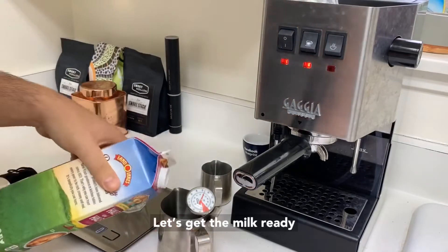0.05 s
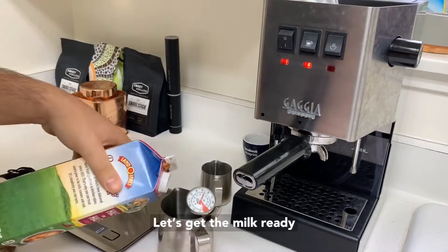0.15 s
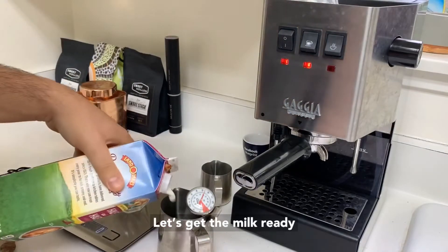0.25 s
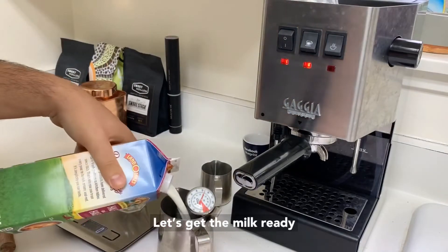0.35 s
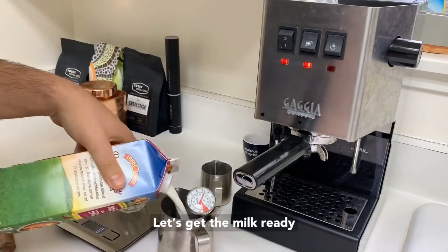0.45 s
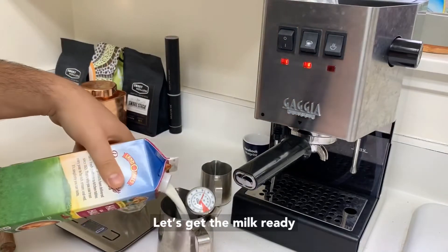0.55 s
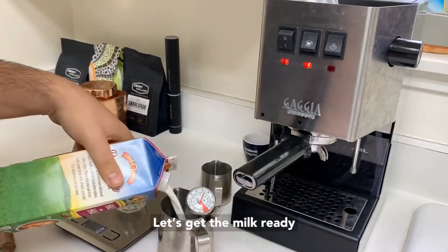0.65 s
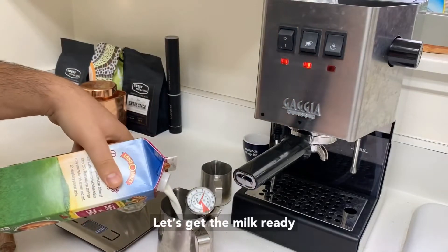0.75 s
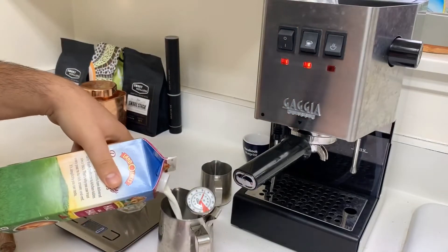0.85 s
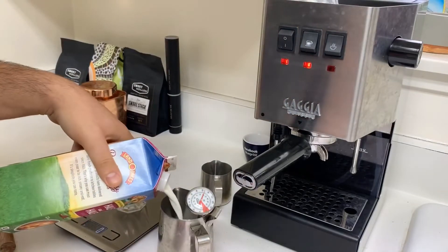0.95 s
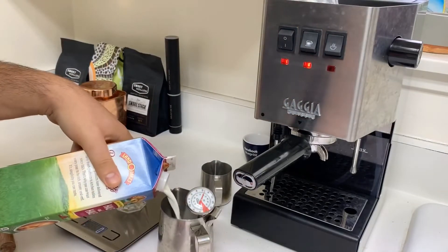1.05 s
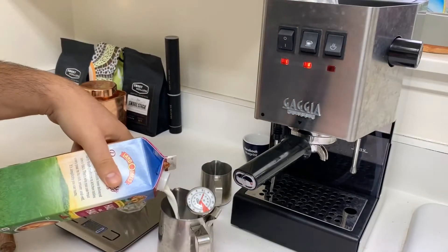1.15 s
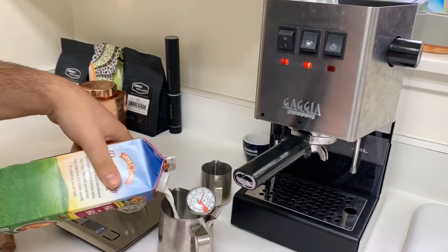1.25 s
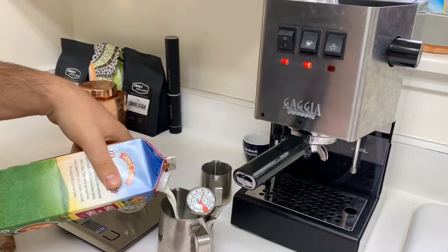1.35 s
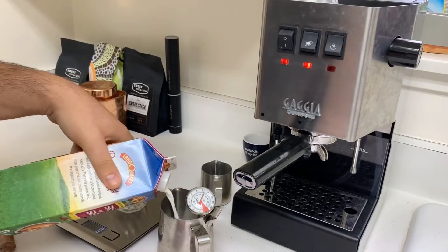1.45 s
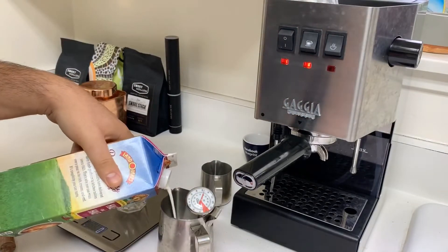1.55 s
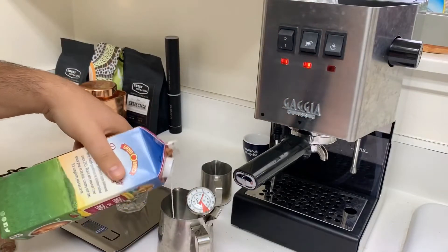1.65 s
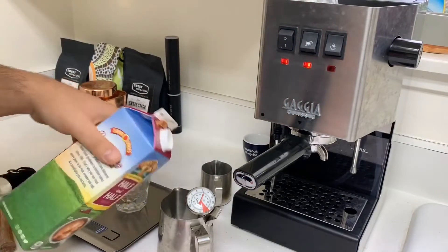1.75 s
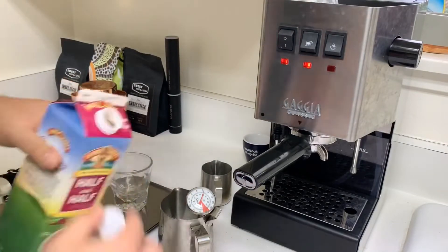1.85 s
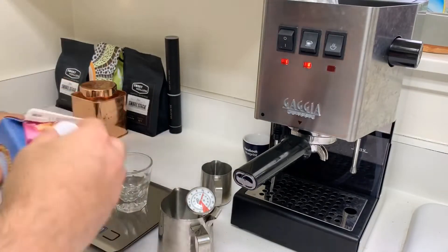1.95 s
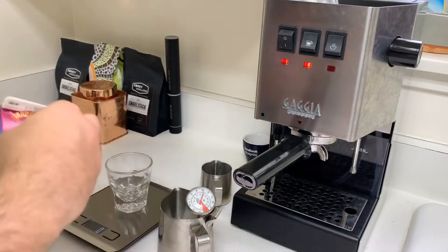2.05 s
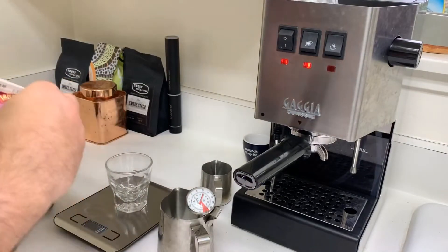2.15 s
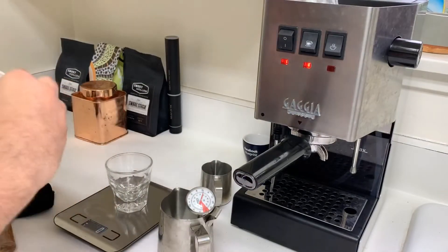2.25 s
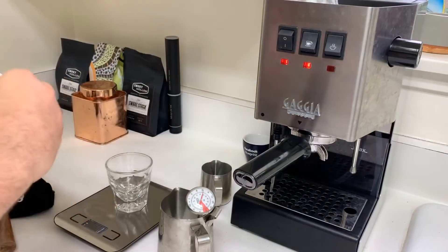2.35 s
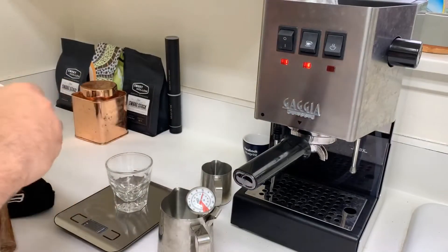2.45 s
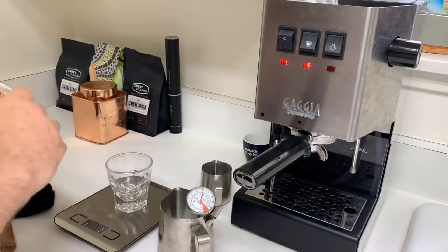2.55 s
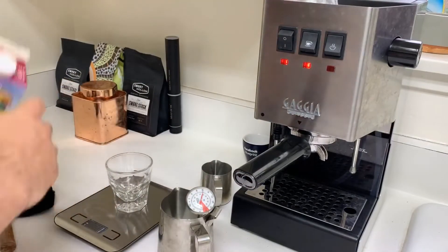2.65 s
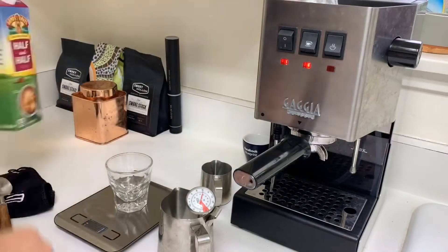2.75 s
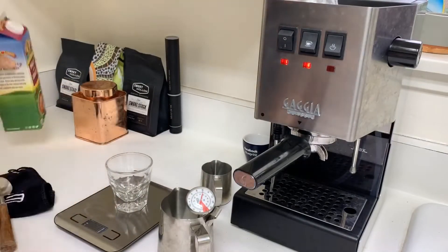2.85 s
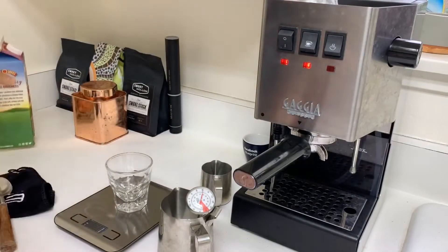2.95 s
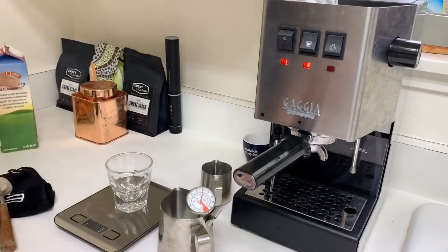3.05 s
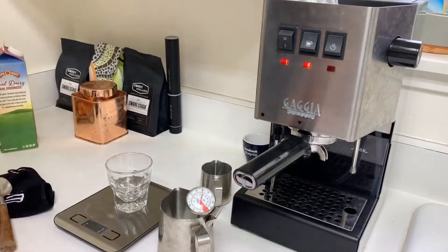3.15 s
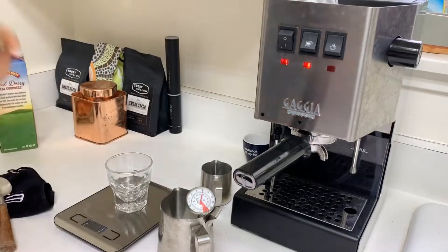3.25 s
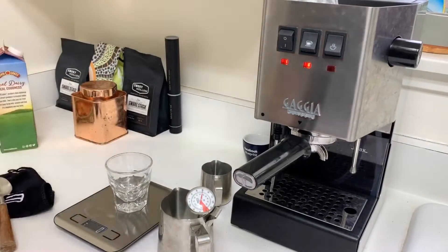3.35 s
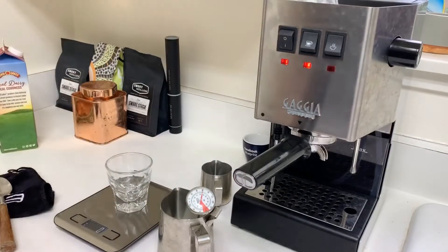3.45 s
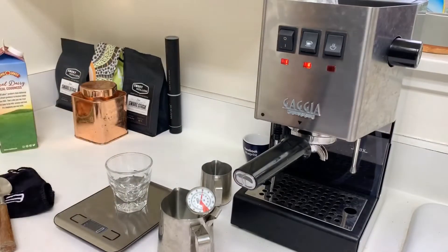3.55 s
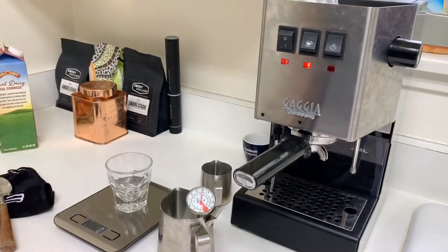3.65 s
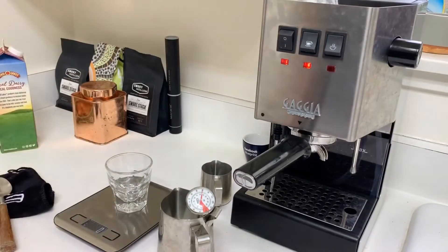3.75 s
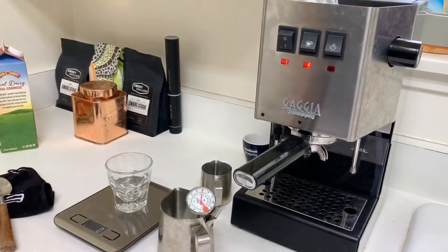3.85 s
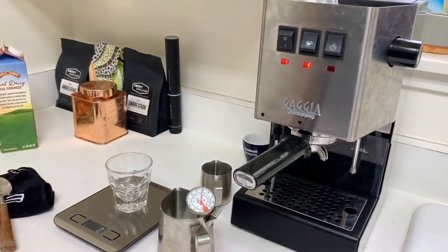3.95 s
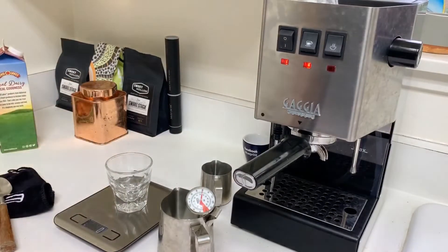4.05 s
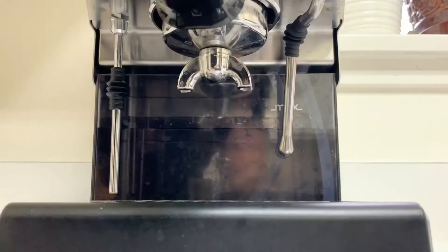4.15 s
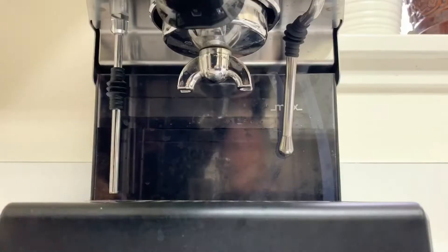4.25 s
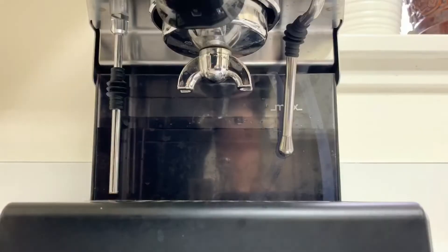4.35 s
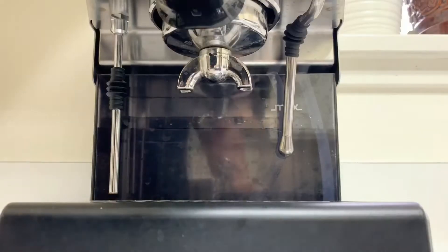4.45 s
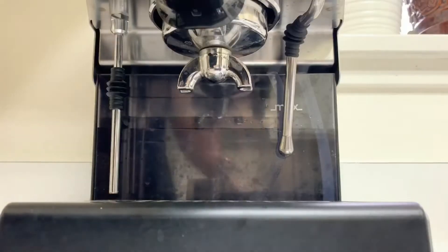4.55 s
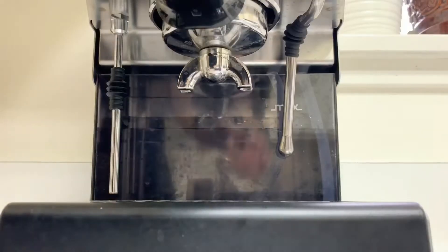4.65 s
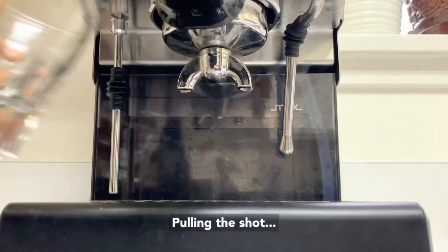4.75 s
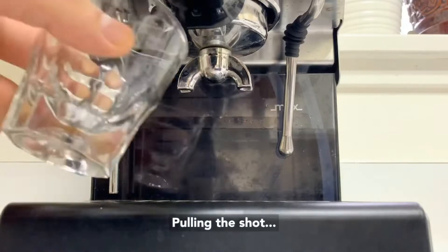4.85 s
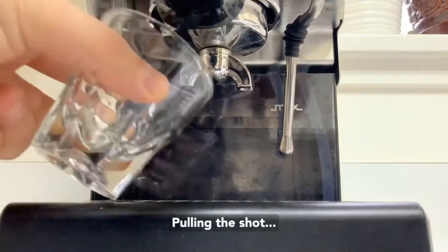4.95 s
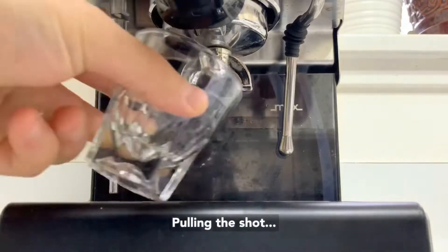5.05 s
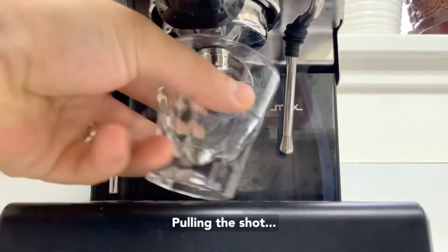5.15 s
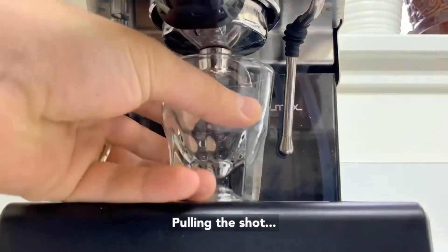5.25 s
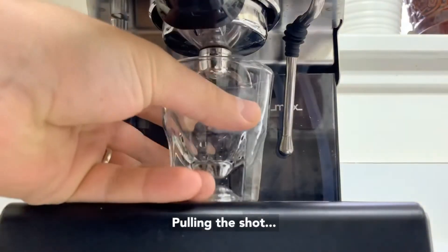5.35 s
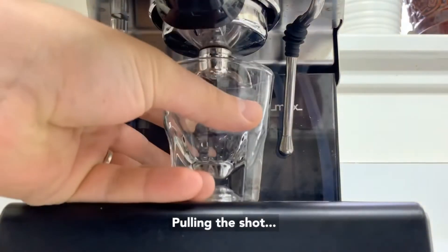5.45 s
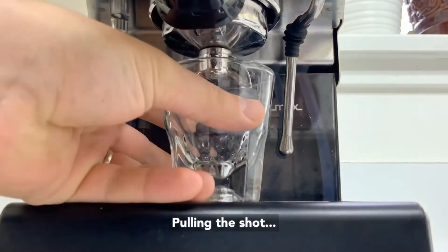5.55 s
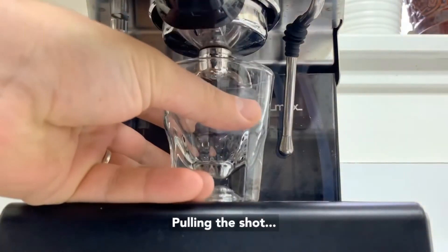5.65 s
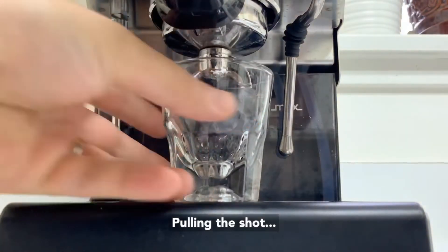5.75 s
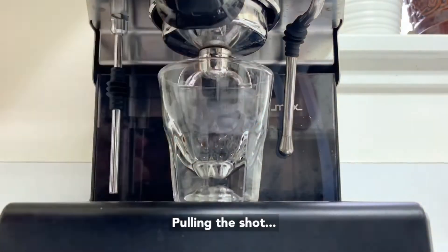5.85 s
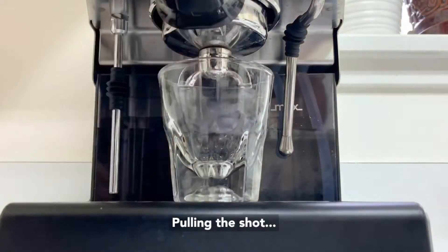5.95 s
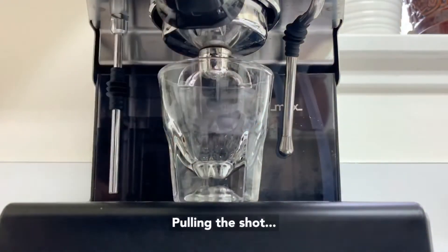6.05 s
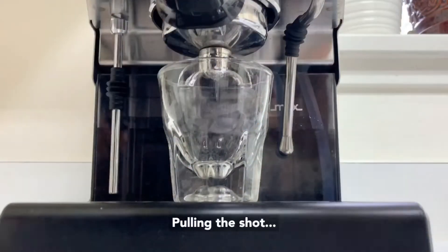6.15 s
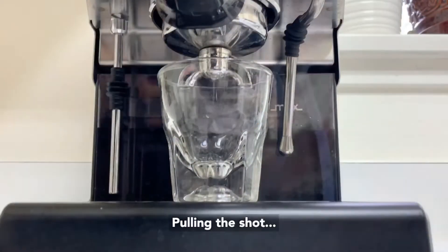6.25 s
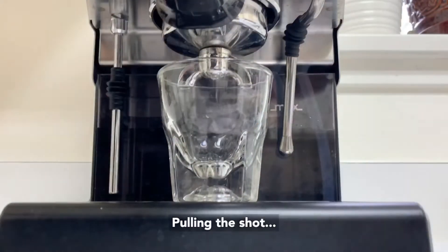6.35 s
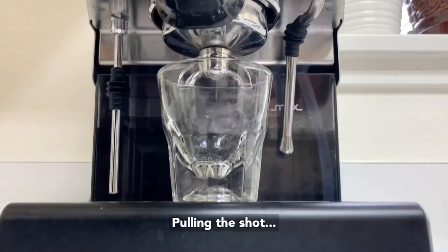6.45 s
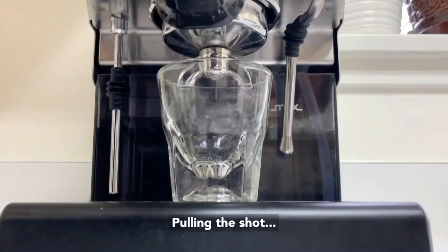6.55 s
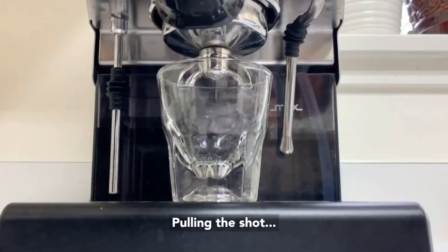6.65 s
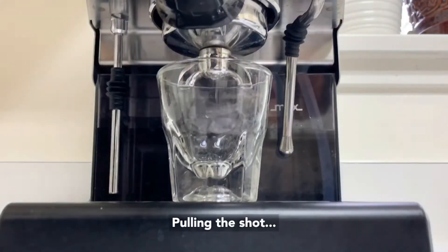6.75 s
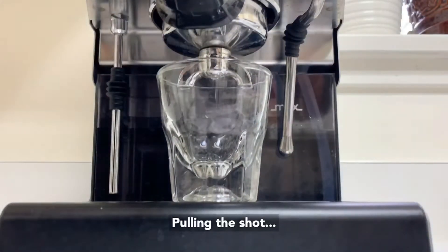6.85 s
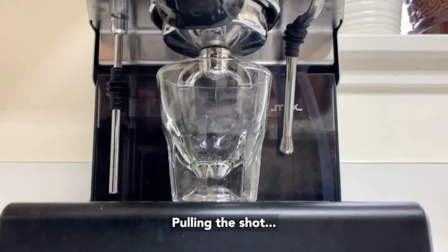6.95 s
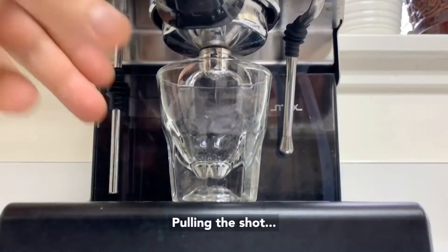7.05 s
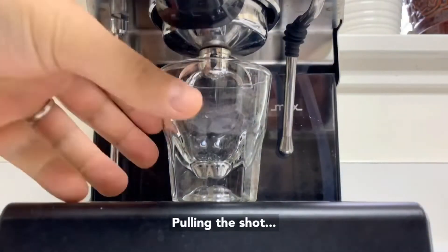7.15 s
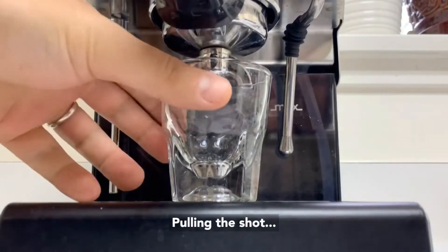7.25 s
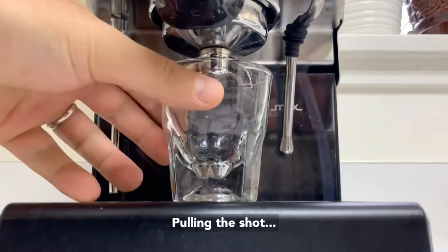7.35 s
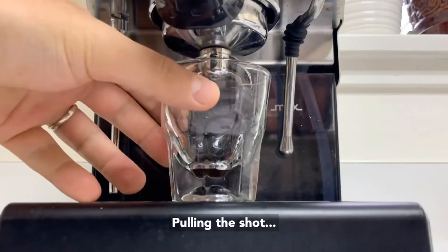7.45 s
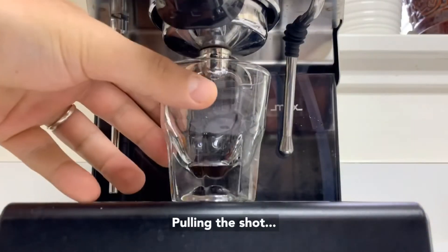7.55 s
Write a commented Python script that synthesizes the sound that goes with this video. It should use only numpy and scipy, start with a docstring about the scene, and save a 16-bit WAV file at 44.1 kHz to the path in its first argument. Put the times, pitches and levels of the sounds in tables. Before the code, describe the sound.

Close, dry domestic kitchen recording with faint room tone and hiss. First come quiet milk glugs, tiny ticks and drips, then papery carton knocks and cap snaps, and dull thumps on the counter. A lull follows. A thick glass knocks rapidly and brightly against the espresso machine's tray, sliding in short scrapes. One loud switch click starts a coarse electric pump buzz that changes colour as pressure builds, then weakens with rougher rattle and brief glass scraping.

```python
"""The vibration pump of an espresso machine, close to the microphone in a quiet home kitchen: it buzzes
first free, then against rising pressure, as overtones of its stroke rate coloured by the case, plus rattle.
Before it, at the counter, milk is poured from a carton, its cap is snapped on and it is set down; then, at
the machine, a glass is slid over the drip tray and a rocker switch snaps. Noisy contacts ring their modes.
Under it all lie room tone, rumble, slow pressure sway, faint appliance tones and microphone hiss."""
import sys
import numpy as np
from scipy import signal
from scipy.fft import rfft, irfft
from scipy.io import wavfile

SR = 44100
rng = np.random.default_rng(int(sys.argv[2]) if len(sys.argv) > 2 else 0)


def wrap_up_sound(samples):
    """Save the sound to the file named by the first command line argument, as 16-bit audio."""
    columns = np.atleast_2d(samples).T
    # keep every value between -1 and 1, then stretch to whole-number steps
    tamed = np.clip(columns, -1, 1)
    steps = np.round(tamed * 32767).astype(np.int16)
    wavfile.write(sys.argv[1], SR, steps)


N = 334719
TIME = np.arange(N) / SR

# Air of the kitchen. Each row: time in seconds, rms of slow pressure sway, of rumble and of room tone in dB.
AIR = [(0, -64.5, -69.5, -72.5), (1.1, -82, -68, -72.5), (2.6, -70.5, -65, -67.5),
       (3.18, -58.5, -60.5, -67.5), (3.32, -45, -60, -64.5), (3.92, -51, -65.5, -70.5),
       (4.1, -59.5, -67.5, -70), (5.95, -65.5, -73.5, -70)]
# Spectra of the room tone and of the microphone hiss. Each row: frequency in Hz, density in dB per Hz.
ROOM_TONE = [(82, -21), (140, -7), (451, -11), (770, -8.5), (903, -14.5), (2080, -18.5), (13400, -49.5),
             (16000, -62)]
HISS = [(1000, -17), (4000, -5), (11000, 3), (16000, -4.5)]
# Faint appliance tones at the counter and near the machine. Each row: frequency in Hz, mean rms level in dB.
COUNTER_TONES = [(969.0, -80.5), (1093, -83), (1577, -86.5), (6923, -100)]
MACHINE_TONES = [(155.6, -74.5), (769.8, -78.5), (1017, -82.5), (1384, -84), (1846, -85.5), (2003, -85),
                 (8769, -99)]
# Drips and small ticks. Each row: start in seconds, peak in dB, pitch in Hz, second pitch in Hz,
# t60 of the first pitch in seconds.
DRIPS = [(.38, -68, 4500, 7200, .02), (.418, -57, 5900, 10500, .02), (.44, -63, 3500, 5400, .025),
         (.467, -59, 10700, 7800, .03), (.659, -60, 5350, 1750, .1), (.712, -62, 6500, 4300, .07),
         (1.662, -50, 3413, 5943, .07), (4.515, -62, 4300, 6500, .015)]
# Brushing hands. Each row: moment of the swell's top in seconds, level in dB, decay constant in seconds.
SWISHES = [(.45, -75.5, 0.1), (.72, -75, 0.014), (2.33, -67.5, 0.12), (2.949, -63, 0.055),
           (3.364, -53.5, 0.033), (4.5, -70, 0.039), (4.72, -73, 0.14), (5.33, -74.5, 0.037)]
# Spectrum of the brushing. Each row: frequency in Hz, density in dB per Hz.
RUSTLE = [(1470, -22), (2500, -11), (5870, -16.5), (12200, -15.5), (16000, -17.5)]
# Blows on each object. Each row: start in seconds, nominal peak in dB, treble share in dB (held below -0.5).
MILK_GLUGS = [(0.532, -53.5, -23), (0.585, -51, -50), (0.834, -43, -53), (1.299, -56.5, -29),
              (1.53, -54, -37), (1.776, -49.5, -39)]
CARTON_KNOCKS = [(1.93, -48.5, -31), (1.945, -52.5, -3), (2.003, -44, -5.5), (2.011, -48, 1.5),
                 (2.058, -29, -6), (2.178, -39, -44), (2.252, -44, -5.5), (2.307, -36, -2.5),
                 (2.417, -53.5, -7), (2.503, -31.5, -7), (2.593, -49, -33), (3.014, -46, -11),
                 (3.031, -63, -25)]
COUNTER_THUMPS = [(2.744, -43, -22), (2.948, -34.5, -17), (3.339, -47.5, -1), (3.361, -38, -2.5),
                  (4.131, -54, -32)]
EDGE_TAPS = [(4.7848, -27, -2.8)]   # the glass first touches the edge of the tray
GLASS_KNOCKS = [(4.9364, -18, -1.5), (4.9515, -27, -4.5), (4.962, -28.5, -19.5), (4.9676, -23.5, 0.5),
                (4.9838, -22.5, -8), (5.009, -25.5, -13.5), (5.023, -28.5, -2.5), (5.0275, -27.5, -17.5),
                (5.0557, -31, -3.5), (5.0651, -14, -3), (5.0862, -21.5, -2), (5.097, -27.5, -3),
                (5.1063, -28, -7), (5.1178, -20, -3.5), (5.1634, -27.5, -6.5), (5.1735, -27.5, -7.5),
                (5.212, -21.5, -2), (5.3173, -54, -9)]
SWITCH_CLICKS = [(5.8414, -47, -0.35), (5.9248, -13, -0.36)]
# Modes each object rings with, before chance shifts them. Each row: frequency in Hz, relative gain in dB,
# t60 in seconds.
MILK = [(229, 2.5, 0.068), (1060, 18, 0.012), (1420, 8, 0.018), (4450, 0, 0.0075)]
CARTON = [(935, 2, 0.028), (1330, -0.5, 0.018), (2310, -8.5, 0.02), (5650, 18, 0.0071), (6800, 7, 0.013)]
COUNTER = [(175, 6, 0.03), (320, 12, 0.025), (520, 2, 0.018), (898, -1, 0.022), (9500, -2, 0.0044)]
TRAY_EDGE = [(1012, -8, 0.05), (1400, -3, 0.026), (2350, 2, 0.022), (3130, -5, 0.045), (5200, 0, 0.011)]
GLASS_ON_TRAY = [(1477, 8, 0.021), (2126, 8, 0.014), (3120, -1.5, 0.02), (4620, 7.5, 0.009),
                 (6300, 5.5, 0.019), (8630, 2.5, 0.018), (11140, -2, 0.015)]
SWITCH = [(94, -21, 0.15), (1580, 5, 0.013), (3250, -9.5, 0.014), (5050, 3, 0.016), (8140, 11, 0.011)]
# Modes of the dull thud of the tray. Each row: frequency in Hz, relative rms in dB, t60 in seconds.
TRAY = [(102, -3.5, 0.039), (680, 0, 0.01)]
# Glass dragged over the tray. Each row: start in seconds, end in seconds, nominal level in dB.
DRAGS = [(4.934, 5.031, -44.5), (5.05, 5.116, -43.5), (5.157, 5.198, -48.5), (7.224, 7.264, -51),
         (7.306, 7.354, -42), (7.367, 7.414, -44)]
# Level of the pump, as its hum. Each row: time in seconds, rms of the hum in dB.
HUM = [(5.96, -42.5), (7.13, -42.5), (7.59, -47.5)]
# Pressure ahead of the pump. Each row: time in seconds, share of full pressure (0 to 1).
PRESSURE = [(6.36, .02), (6.46, 0.84), (6.98, 1)]
# Resonances of the case that colour the overtones. Each row: frequency in Hz, width in Hz,
# level in dB over the hum when running free, under pressure, faltering.
CASE = [(388, 262, -4.5, -4.5, -9.5), (622, 91, -24, -16, -7), (749, 56, -3.5, -7, -6),
        (1088, 120, -7.5, -6, -8.5), (1329, 75, 5.5, -0.5, -2.5), (1687, 350, -17.5, -5.5, -11),
        (2207, 570, -12.5, -15, -10.5), (2489, 45, -8.5, -8, -14), (3029, 120, -4, 1.5, -8.5),
        (3584, 310, -8.5, -7, -26), (4045, 42, -11.5, -11.5, -16), (4430, 140, -8, -5, -15),
        (4870, 210, -11, -9.5, -16)]
# Higher overtones before drift and losses. Each row: frequency in Hz, level in dB over the hum.
CASE_TREBLE = [(5300, -13), (5750, -29), (6350, -11.5), (6800, -14.5), (7300, -27), (8700, -18),
               (11500, -27)]
# Spectrum of the rattle. Each row: frequency in Hz, density in dB per Hz.
RATTLE = [(500, -4), (950, 0), (1400, 6), (2200, -2), (2800, -3), (3300, 7), (4500, 1), (5700, -4),
          (6400, 2.5), (7500, -3), (15500, -7.5)]

HISS_DB = -88
MOVE_S = 4.064   # the microphone moves from the counter to the machine
MOVE_POP_DB, MOVE_POP_S = -39, .012
# fainter drips fall at random as the milk starts to run
POUR_S, SPATTERS_PER_S, SPATTER_DB = (0.48, 0.79), 20, -72
DRIP_T60_S = .02   # of the faint drips, and of every drip's second pitch
DRIP_SPLASH_DB, DRIP_PARTIAL_DB = -10, -3   # rms relative to the first pitch
ROOM_T60_S, ROOM_DB, WALL_CUT_HZ = 0.18, -9.5, 580
TRAY_THUD_DB = -23.5   # thud of the tray relative to the nominal peak of each knock of the glass
STROKE_HZ = 155.58
PUMP_ON_S, SETTLE_S = 5.93, .05   # the first strokes clatter, then settle
STAGGER = .018   # under pressure strokes land early and late by turns, by this angle in radians
FALTER_S, FALTER_RISE_S = 7.0, .07   # from here on the pump falters: its overtones shift, its rattle grows
LIMP_S, LIMP_DEPTH, LIMP_HZ = (7.04, 7.26), .5, (2400, 12000)   # strong and weak knocks alternate in this band
RATTLE_DB, CLATTER_DB, FALTER_RATTLE_DB = -6.5, 18.5, 4.5   # rattle over the hum, and what each state adds
CLATTER_LOSS_DB = 14   # loss of the overtones during the clatter, less for the lowest
TREBLE_FROM_HZ, FALTER_LOSS_DB = 5400, 8   # overtones from here up lose this when the pump falters
MUFFLE_S, MUFFLE_HZ = 7.42, 7500   # the hand round the glass shades the treble of buzz and rattle
CUTOFF_HZ = 16950


def from_db(db):
    """Decibels to gain."""
    return 10 ** (np.asarray(db) / 20)


def rms_one(x):
    """Scales to rms 1."""
    return x / np.sqrt(np.mean(x ** 2) + 1e-20)


def butter(x, order, hz, kind="low"):
    """Butterworth filter."""
    return signal.sosfilt(signal.butter(order, hz, kind, fs=SR, output="sos"), x)


def in_time(rows, time=TIME):
    """Each column of a curve, read at the given times."""
    s, *columns = np.transpose(rows)
    return [np.interp(time, s, c) for c in columns]


def at_hz(points, hz):
    """Reads a spectrum on a log-frequency axis."""
    point_hz, point_db = np.transpose(points)
    return np.interp(np.log(hz), np.log(point_hz), point_db)


def drift(rate, time=TIME):
    """Slow chance: random points of spread 1, `rate` of them a second, joined by straight lines."""
    points = rng.standard_normal(int((time[-1] - time[0]) * 200) + 3)
    return np.interp((time - time[0]) * rate, np.arange(len(points)), points)


def coloured(spectrum, size=N):
    """Noise with the given spectrum, rms 1."""
    hz = np.maximum(np.arange(size // 2 + 1) * SR / size, 1)
    white = rfft(rng.standard_normal(size))
    return rms_one(irfft(white * from_db(at_hz(spectrum, hz)), size))


def ring(force, hz, t60):
    """A mode driven by a force: a decaying two-pole resonance that radiates nothing near 0 Hz."""
    radius = from_db(-60 / (max(t60, .002) * SR))
    angle = 2 * np.pi * min(hz, 16000) / SR
    poles = [1, -2 * radius * np.cos(angle), radius * radius]
    return signal.lfilter([.5, 0, -.5], poles, force + 1e-18)


def add(out, s, sound):
    """Mixes a sound in at time s."""
    i = round(s * SR)
    out[i:i + len(sound)] += sound[:N - i]


def tones(lines):
    """Faint appliance tones: sines that waver a little in level and phase."""
    out = np.zeros(N)
    for hz, db in lines:
        level = from_db(db + 3 + 2.5 * drift(8))   # +3 dB: rms to peak
        out += level * np.sin(2 * np.pi * hz * TIME + 1.2 * drift(10))
    return out


def air():
    """Room tone, rumble, pressure sway and microphone hiss as shaped noise, appliance tones and a low pop."""
    sway_db, rumble_db, tone_db = in_time(AIR)
    sway = coloured([(4, -5.5), (10, 0), (22, -3.5), (40, -25), (80, -76.5)])
    rumble = coloured([(25, 0.0), (45, -0.5), (75, -2.5), (125, -4.5), (170, -35.5), (300, -76.0)])
    tone = coloured([(70, -41.5)] + list(ROOM_TONE))
    out = from_db(sway_db) * sway + from_db(rumble_db) * rumble + from_db(tone_db) * tone
    out += from_db(HISS_DB) * coloured(HISS)
    out += np.where(TIME < MOVE_S, tones(COUNTER_TONES), tones(MACHINE_TONES))
    # a low pop as the microphone moves: pressure sinks, then jumps back
    progress = np.arange(round(MOVE_POP_S * SR)) / (MOVE_POP_S * SR)
    dip = np.sin(np.pi * .8 * progress) ** 2
    add(out, MOVE_S - MOVE_POP_S, -from_db(MOVE_POP_DB) * dip)
    return out


def drips():
    """Each drip is a short rough ring on two pitches with a tiny splash."""
    out, t = np.zeros(N), TIME[:SR // 10]
    chance = rng.random((60, 4))
    times = POUR_S[0] - np.cumsum(np.log(1 - chance[:, 0])) / SPATTERS_PER_S
    faint = []
    for s, (_, a, b, c) in zip(times, chance):
        if s < POUR_S[1]:
            faint.append((s, SPATTER_DB + 8.0 * (a - .5), 2000 * 3.5 ** b, 4000 * 2.3 ** c, DRIP_T60_S))
    for s, peak_db, hz, second_hz, t60 in list(DRIPS) + faint:
        touch = rng.standard_normal(len(t)) * np.exp(-t / 0.0034)
        drip = rms_one(ring(touch, hz, t60))
        drip += from_db(DRIP_SPLASH_DB) * rms_one(ring(touch, hz, 0.0057))
        drip += from_db(DRIP_PARTIAL_DB) * rms_one(ring(touch, second_hz, DRIP_T60_S))
        add(out, s, from_db(peak_db) * drip / np.abs(drip).max())
    return out


def kitchen(x):
    """Dense short reverberation of the room, duller as it dies: x convolved with a decaying noise tail."""
    t = TIME[:SR // 2]
    noise = rng.standard_normal(len(t))
    dull = butter(noise, 1, WALL_CUT_HZ)
    early_bright = .5 * noise * np.exp(-t / 0.024)
    tail = (dull + early_bright) * from_db(-60 * t / ROOM_T60_S) * (t > .003)
    return signal.fftconvolve(x, tail / np.sqrt(np.sum(tail ** 2)))[:N]


def swishes():
    """Hands and sleeves brush past: grainy bright noise that swells and dies."""
    level = np.zeros(N)
    for s, db, decay_s in SWISHES:
        slope_s = decay_s * np.where(TIME < s, .6, 1)   # swells faster than it dies
        level += from_db(db) * np.exp(-np.abs(TIME - s) / slope_s)
    grain = from_db(0.83 * drift(150))
    return level * grain * coloured([(1200, -52)] + list(RUSTLE))


def blows(events, modes, contact_s, crack_db, tail_s, low_cut_hz=150, dull_db=4, grip=0.071):
    """A rough contact drives the modes, which the grip shifts a little; an untuned crack dies beside them."""
    out, t = np.zeros(N), TIME[:SR // 4]
    for s, peak_db, treble_db in events:
        contact = rng.standard_normal(len(t)) * np.exp(-t / contact_s) * np.minimum(t / 0.0002, 1)
        chance = rng.standard_normal((len(modes), 2))
        low, high = np.zeros(len(t)), np.zeros(len(t))
        for (hz, db, t60), (level_chance, pitch_chance) in zip(modes, chance):
            sound = from_db(db + 2.0 * level_chance) * ring(contact, hz * (1 + grip * pitch_chance), t60)
            if hz < 4000:
                low += sound
            else:
                high += sound
        crack = from_db(crack_db) * rng.standard_normal(len(t)) * np.exp(-t / tail_s)
        bright_crack = butter(crack, 1, [4000, 10500], "band")
        dull_crack = butter(crack, 2, [700, 4500], "band")
        high = high / np.abs(high).max() + bright_crack
        low = butter(low / np.abs(low).max(), 2, 4000) + from_db(dull_db) * dull_crack
        share = from_db(min(treble_db, -.5))
        add(out, s, from_db(peak_db) * (np.sqrt(1 - share ** 2) * low + share * high))
    return butter(out, 4, low_cut_hz, "high")


def thuds(events, modes, level_db):
    """The tray under the glass answers every knock with a dull thud: a short noisy push rings its modes."""
    out, t = np.zeros(N), TIME[:SR // 8]
    for s, peak_db, _ in events:
        push = rng.standard_normal(len(t)) * np.exp(-t / 0.0037)
        thud = sum(from_db(db) * rms_one(ring(push, hz, t60)) for hz, db, t60 in modes)
        add(out, s, from_db(peak_db + level_db) * thud / np.abs(thud).max())
    return butter(out, 2, 1200)


def drags():
    """The glass foot skips over the tray slots: dense uneven clicks drive the modes of the glass."""
    clicks = (rng.random(N) < 2500 / SR) * from_db(2.2 * rng.exponential(1, N)) * rng.choice([-1, 1], N)
    # in step with the pump once it runs
    clicks *= 1 + .8 * (TIME > PUMP_ON_S) * np.cos(2 * np.pi * STROKE_HZ * TIME - 3)
    body = np.zeros(N)
    for hz, db, t60 in GLASS_ON_TRAY:
        # sliding: weaker treble and longer ringing than when knocked
        body += from_db(db - 10.0 * (hz >= 4000)) * ring(clicks, hz, 1.35 * t60)
    scrape = rms_one(ring(clicks, 3600, .002))
    sound = butter(rms_one(body) + scrape, 6, 1180, "high")
    gain = sum(from_db(db) * (TIME > start) * (TIME < end) for start, end, db in DRAGS)
    soft_gain = signal.lfilter([.005], [1, -.995], gain)   # rounds the starts and ends
    return soft_gain * sound


def case_gain(hz, pressure, falter):
    """Strength of an overtone: the resonances of the case shift their weight with the state of the pump."""
    power = 0
    for top_hz, width_hz, free_db, loaded_db, falter_db in CASE:
        running_db = (1 - pressure) * free_db + pressure * loaded_db
        db = (1 - falter) * running_db + falter * falter_db
        power = power + from_db(2 * db) / (1 + (2 * (hz - top_hz) / width_hz) ** 2) ** 1.47
    return np.sqrt(power)


def pump():
    """The piston strikes once a stroke: overtones of its rate, gated rattle; it limps when the flow falters."""
    out, t = np.zeros(N), TIME[round(PUMP_ON_S * SR):]
    slow, size = t[::64], len(t)   # the state of the pump is followed on a coarse clock
    (hum_db,), (pressure,) = in_time(HUM, slow), in_time(PRESSURE, slow)
    pressure = np.clip(pressure, 0, 1)
    clatter = np.exp(-(slow - PUMP_ON_S) / SETTLE_S)
    falter = np.clip((slow - FALTER_S) / FALTER_RISE_S, 0, 1)
    turn = 2 * np.pi * STROKE_HZ * t - 1.2
    stagger = STAGGER * np.interp(t, slow, pressure) * np.cos(turn / 2)

    # the hum at the stroke rate has rms 1; overtones up to the fifth join it, the others make the buzz
    body, buzz, lag = np.sqrt(2) * np.cos(turn), np.zeros(size), 0.
    for k in range(2, 74):
        hz = k * STROKE_HZ
        if hz < TREBLE_FROM_HZ:
            gain = case_gain(hz, pressure, falter)
        else:
            gain = from_db(at_hz(CASE_TREBLE, hz) + 0.53 * drift(7.3, slow) - FALTER_LOSS_DB * falter)
        unsteady = min(k / 8.5, 1) ** 2   # the lowest overtones hold steadier
        gain = gain * from_db(unsteady * (-CLATTER_LOSS_DB * clatter + 2.5 * drift(6, slow)))
        # the case answers late: each overtone lags the last by a part of the stroke
        lag += 2 * np.pi * (rng.uniform(0, .7) if k > 5 else .05)
        jitter = np.interp(t, slow, .004 * k * drift(25, slow))
        line = np.interp(t, slow, gain) * np.cos(k * (turn + stagger) - lag + jitter)
        if k <= 5:
            body += line
        else:
            buzz += line

    rattle_db = RATTLE_DB + CLATTER_DB * clatter + FALTER_RATTLE_DB * falter + 1.6 * drift(30, slow)
    gate = 1 + 0.45 * np.cos(turn - 2.4)   # the rattle swells once a stroke
    rattle = np.interp(t, slow, from_db(rattle_db)) * gate * coloured(RATTLE, size)

    upper = buzz + rattle
    shade = np.clip((t - MUFFLE_S) / 0.0096, 0, 1)
    upper = (1 - shade) * upper + shade * butter(upper, 1, MUFFLE_HZ)
    limp = LIMP_DEPTH * np.clip(np.minimum(t - LIMP_S[0], LIMP_S[1] - t) / 0.013, 0, 1)
    alternate = np.cos(turn / 2 - 1.1 * np.pi)   # half the stroke rate
    upper += limp * alternate * butter(upper, 2, LIMP_HZ, "band")

    rise = 1 - np.exp(-(t - t[0]) / 0.025)
    out[N - size:] = rise * np.interp(t, slow, from_db(hum_db)) * (body + upper)
    return out


def scene():
    """All sources; pump and air stay dry, the room answers the rest."""
    hits = blows(CARTON_KNOCKS, CARTON, contact_s=0.0055, crack_db=-10.0, tail_s=0.022)
    hits += blows(COUNTER_THUMPS, COUNTER, contact_s=0.0048, crack_db=-11.0, tail_s=0.01,
                  low_cut_hz=120, dull_db=-12)
    hits += blows(GLASS_KNOCKS, GLASS_ON_TRAY, contact_s=0.002, crack_db=-5, tail_s=0.007,
                  low_cut_hz=1250, grip=0.05)
    hits += blows(EDGE_TAPS, TRAY_EDGE, contact_s=0.0012, crack_db=-13, tail_s=0.012, grip=0.005)
    hits += blows(MILK_GLUGS, MILK, contact_s=0.029, crack_db=-45, tail_s=0.017)
    hits += blows(SWITCH_CLICKS, SWITCH, contact_s=0.00013, crack_db=-2, tail_s=0.0058,
                  low_cut_hz=64, grip=0.0071)
    hits += thuds(GLASS_KNOCKS, TRAY, TRAY_THUD_DB) + drips() + drags() + swishes()
    return (hits + from_db(ROOM_DB) * kitchen(hits) + pump() + air())[None]


def record(dry):
    """Low-passes the finished mix steeply: nothing is heard above about 17 kHz."""
    return signal.sosfilt(signal.cheby2(12, 70, CUTOFF_HZ, fs=SR, output="sos"), dry)


dry = scene()
out = record(dry)
wrap_up_sound(out)
```